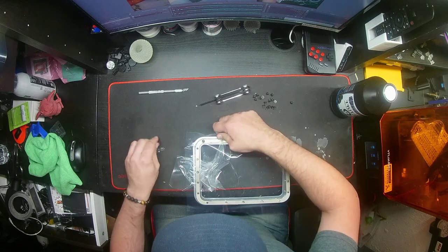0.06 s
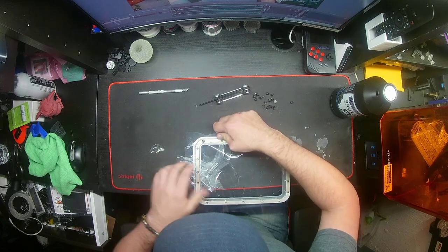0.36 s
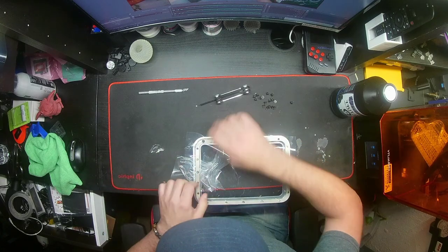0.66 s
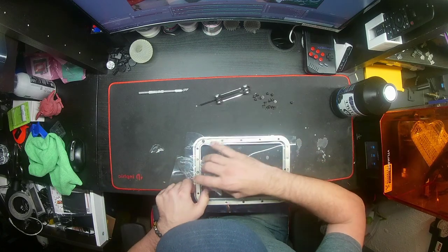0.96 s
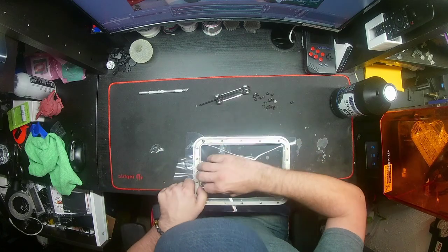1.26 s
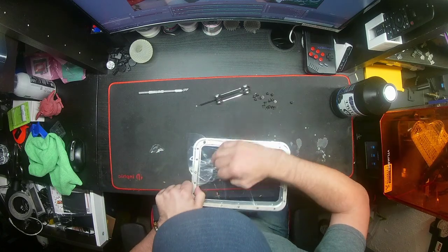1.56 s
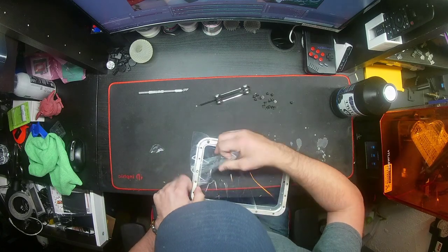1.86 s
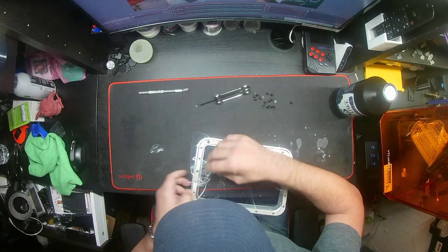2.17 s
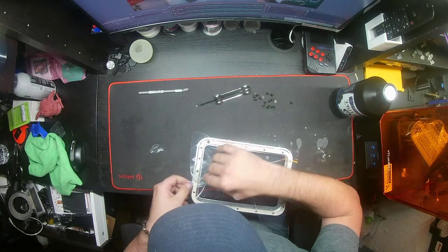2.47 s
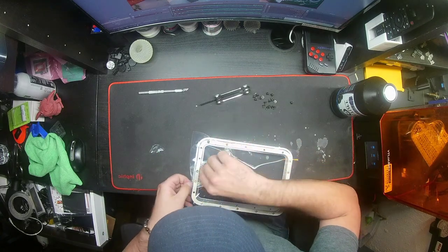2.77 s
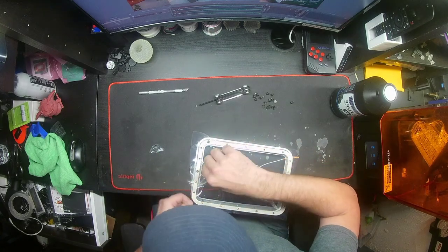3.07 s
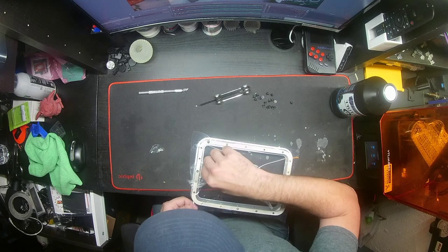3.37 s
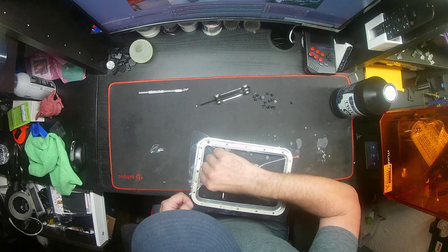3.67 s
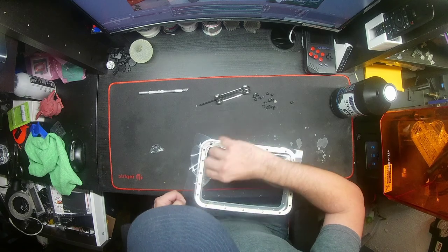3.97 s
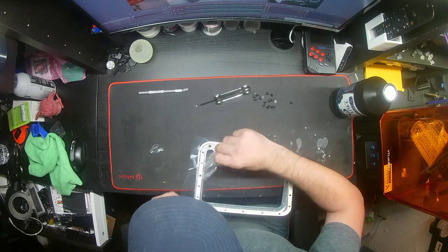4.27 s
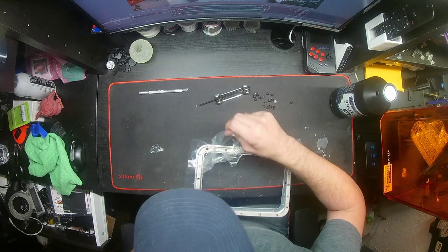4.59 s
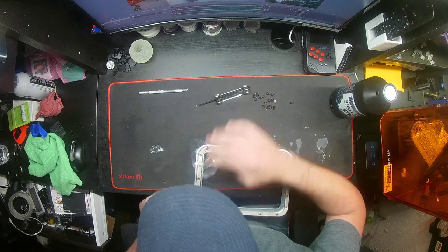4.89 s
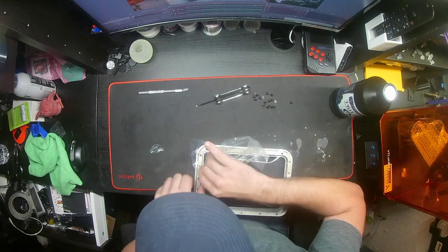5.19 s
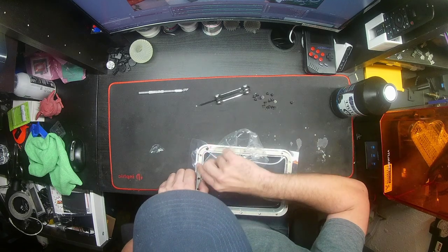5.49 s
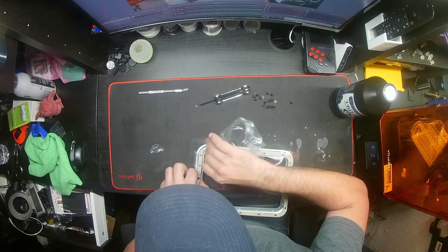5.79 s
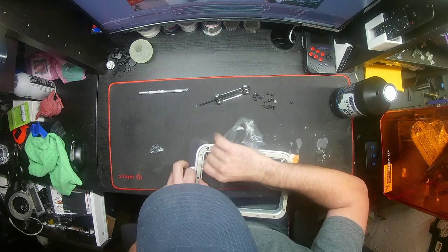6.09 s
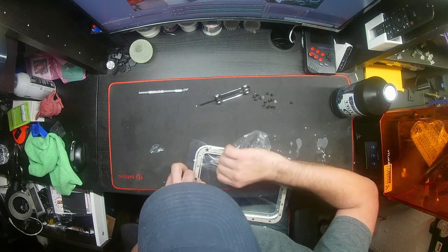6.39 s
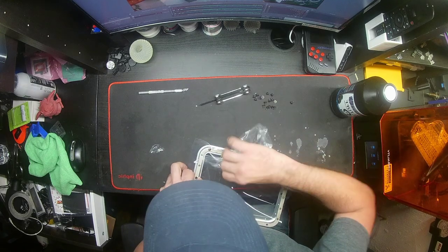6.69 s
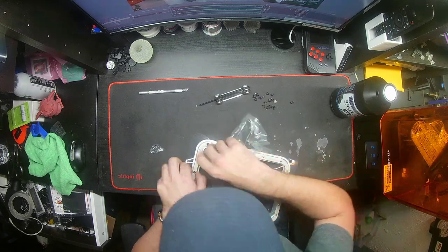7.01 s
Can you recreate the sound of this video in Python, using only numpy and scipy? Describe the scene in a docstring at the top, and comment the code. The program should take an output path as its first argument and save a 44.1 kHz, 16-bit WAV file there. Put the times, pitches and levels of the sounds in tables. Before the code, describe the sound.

A quiet fan hums in a small room while thin plastic film is pulled from a stiff frame, heard from nearby. The film rustles, rubs and snaps in three main bursts, with softer crackles between them and a few tiny squeaks where it grips. Fingers occasionally clack on the frame, and from about halfway it knocks dully against the desk. The sharpest cracks come near the end.

```python
"""Crinkling and sharp crackles over a quiet fan: hands peel and crumple a thin plastic film off a rigid
frame, at a desk in a small room. The film buckles in showers of tiny snaps, and single creases give way
with a louder crack. It rubs along the frame and squeaks where it grips. Now and then the frame clacks
under a tap, and in the second half it bumps the desk with dull thuds."""
import sys
import numpy as np
from scipy import signal
from scipy.fft import rfft, irfft
from scipy.io import wavfile
from scipy.ndimage import uniform_filter1d

SR = 44100
rng = np.random.default_rng(int(sys.argv[2]) if len(sys.argv) > 2 else 0)


def put_to_file(sound):
    """Save the sound as 16-bit audio at rate SR, in the file named by the first command-line argument."""
    columns = np.atleast_2d(sound).T  # one column per channel
    safe = np.clip(columns, -1, 1)
    whole_steps = np.round(safe * 32767)
    wavfile.write(sys.argv[1], SR, whole_steps.astype(np.int16))


N = 310905

# The tone of the moving air. Each row: frequency in Hz, relative level in dB.
AIR_COLOUR = [(12, -58), (25, -62.5), (50, -69), (80, -71.5), (180, -80.5), (400, -87), (900, -88),
              (1400, -95.5), (2800, -100), (6000, -106), (8700, -105), (12000, -114), (16000, -122)]
# The fan's hum. Each row: pitch in Hz, level in dB.
FAN_TONES = [(98, -68), (141.5, -65), (468, -68), (511.5, -70), (942.5, -65.5), (990, -70)]
# Pulls on the film. Each row: start in seconds, seconds spent taking up slack before that, length in
# seconds, crinkling level in dB and sliding level in dB at the pull's end, rise over the pull in dB.
PULLS_ON_FILM = [(0.527, .025, 0.059, -50.5, -51.5, -0.5), (0.739, .01, .04, -55, -58, 0),
                 (0.924, 0.035, 0.022, -44.5, -41, 1.5), (1.01, .05, 0.23, -35, -50.5, 3.5),
                 (1.262, 0.0057, 0.065, -31.5, -40, 0), (1.344, .01, 0.056, -35.5, -42, 0),
                 (1.524, .005, 0.035, -37.5, -42, 0), (1.59, 0.018, 0.086, -46.5, -49.5, -2.5),
                 (1.726, .03, 0.031, -49.5, -50, 0), (1.85, .02, 0.18, -52, -60, -1),
                 (2.1, .005, 0.028, -54.5, -55, 0), (2.604, 0.074, 0.027, -50.5, -57, 1.5),
                 (2.683, .01, .11, -51, -55, 0), (3.214, 0.028, 0.013, -57, -56, -3),
                 (3.388, 0.03, .11, -41.5, -47.5, 3.5), (3.544, 0.012, 0.16, -32.5, -37.5, 7),
                 (3.85, 0.013, 0.13, -37, -46.5, 2), (4.029, .03, 0.19, -36.5, -43, 1.5),
                 (4.24, 0.016, 0.066, -26.5, -33, 0), (4.362, .02, 0.043, -59, -56, -2),
                 (4.502, .01, .19, -58.5, -60, -6), (4.98, 0.035, 0.064, -52, -55.5, 0.5),
                 (5.208, .004, 0.045, -49, -51.5, -4), (5.346, 0.018, 0.023, -48, -43, 8),
                 (5.438, .005, 0.036, -46, -45, 7.5), (5.556, 0.049, 0.029, -46, -46.5, 1.5),
                 (5.638, .015, 0.12, -40.5, -51, -2), (5.893, 0.047, 0.066, -37.5, -45.5, 6),
                 (5.993, 0.043, 0.061, -25, -40, -1.5), (6.086, .02, 0.12, -36.5, -51.5, -2.5),
                 (6.257, 0.0057, 0.052, -25, -32.5, 0.5), (6.416, .002, 0.035, -36, -36, -1),
                 (6.528, .02, 0.19, -54, -55.5, -5), (6.937, 0.076, 0.073, -48.5, -55.5, 1)]
# The tones of crinkling, sliding, a crack and a tap. Each row: frequency in Hz, relative level in dB.
CRINKLING_COLOUR = [(200, -36), (700, -11), (1500, -9.5), (2600, -9), (3800, -3), (5000, -7), (6500, -0.5),
                    (8200, 0), (10200, -5.5), (12500, -2.5), (16000, -13.5)]
SLIDING_COLOUR = [(150, -12.5), (400, -4), (620, -6), (850, -0.5), (1700, -1), (3200, -1.5), (6000, -10.5),
                  (16000, -34)]
CREASE_COLOUR = [(200, -7.5), (900, -12), (2500, 0), (4000, -4.5), (7500, 4.5), (10000, 0.5), (12500, 4),
                 (16000, -10)]
TAP_COLOUR = [(150, -9), (450, -4), (1000, 0.5), (2200, -7), (4200, -13), (9000, -12.5), (16000, -43)]
# The notes the frame rings at. Each row: pitch in Hz, relative level in dB, seconds to fade by 60 dB.
FRAME_MODES = [(521, -5, 0.2), (823, 3.5, 0.033), (1052, 3, 0.052), (1274, -11, 0.074), (1483, -3, 0.014),
               (1750, -5.5, 0.019)]
# Single creases snapping. Each row: start in seconds, level in dB, pitch of the ring in Hz.
CREASE_SNAPS = [(.577, -29, 11400), (.639, -28.5, 8640), (.749, -29, 6600), (.77, -27.5, 8740),
                (1.264, -14, 12400), (1.321, -13, 6600), (1.326, -11.5, 7800), (1.393, -23, 7100),
                (1.479, -17.5, 3000), (1.483, -23.5, 2900), (1.527, -19, 4400), (1.808, -24.5, 12700),
                (1.822, -25.5, 3530), (1.892, -24.5, 7100), (1.921, -28, 11400), (2.013, -27.5, 3300),
                (2.102, -31.5, 6560), (2.226, -32, 3420), (2.27, -33.5, 6900), (2.293, -32.5, 6300),
                (2.609, -31.5, 11600), (2.745, -30, 6050), (2.768, -28, 7800), (2.803, -33.5, 7400),
                (2.884, -29.5, 11500), (3.102, -38, 5300), (3.142, -33, 5200), (3.265, -35.5, 7600),
                (3.364, -27.5, 6500), (3.43, -22.5, 11600), (3.474, -16.5, 6250), (3.55, -17, 7350),
                (3.833, -29, 7100), (3.945, -16, 4100), (4.234, -22, 6500), (4.491, -30, 6150),
                (4.514, -30, 6040), (4.63, -28.5, 9400), (4.842, -31.5, 7500), (4.922, -32.5, 6700),
                (5.109, -28, 6400), (5.139, -31, 7200), (5.207, -27.5, 7600), (5.247, -25, 4440),
                (5.292, -29, 6640), (5.319, -26.5, 6800), (5.436, -24.5, 7000), (5.481, -25.5, 7300),
                (5.626, -30, 7160), (5.758, -19.5, 6800), (5.868, -24, 6760), (5.922, -18.5, 6600),
                (5.968, -20, 6300), (5.985, -15, 9600), (6.033, -10, 7700), (6.188, -17.5, 6900),
                (6.259, -14, 6940), (6.28, -8, 11800), (6.413, -13.5, 6500), (6.423, -12.5, 8300),
                (6.461, -14.5, 8350), (6.559, -24.5, 4060), (6.647, -28.5, 11500), (6.695, -28, 7900),
                (6.804, -28.5, 7000), (7.003, -25.5, 8140)]
# Fingers and film tapping the frame. Each row: start in seconds, level in dB.
FRAME_TAPS = [(0.931, -29), (0.946, -27), (1.264, -26), (1.559, -30), (2.633, -33), (3.215, -34),
              (3.328, -36), (4.982, -35.5), (4.999, -26), (5.214, -25), (5.271, -31), (6.805, -32.5)]
# The film squeaking under the fingers. Each row: start in seconds, length in seconds, pitch in Hz,
# level in dB.
FILM_SQUEAKS = [(1.019, 0.048, 1744, -41.5), (1.087, 0.059, 2990, -40), (1.13, 0.083, 1750, -44.5),
                (1.184, 0.038, 2360, -40), (1.285, .07, 1560, -41), (3.85, 0.036, 3500, -38.5),
                (3.939, 0.04, 4140, -37.5)]
# The frame bumping the desk. Each row: start in seconds, level in dB, contact time in milliseconds.
DESK_BUMPS = [(3.765, -30.5, 4.9), (4.165, -32, 2.1), (4.27, -30.5, 7.5), (4.309, -19.5, 3),
              (4.338, -33, 9.4), (4.387, -18.5, 4.4), (4.425, -26.5, 9.8), (4.481, -37.5, 8.9),
              (5.205, -38, 3.5), (5.645, -29, 0.52), (5.748, -39, 2), (5.805, -36.5, 1.4),
              (5.882, -25.5, 4.9), (5.988, -29, 1.9), (6.229, -32, 0.99), (6.264, -34.5, 1.5),
              (6.448, -30, 1.6), (6.708, -33.5, 4.7), (6.737, -33, 6.6)]
# The notes of the desk with the frame on it. Each row: pitch in Hz, relative level in dB, seconds to
# fade by 60 dB.
DESK_MODES = [(72, -11, 0.51), (94.2, -4.5, 0.23), (127.6, -5.5, 0.11), (177, 4.5, 0.052), (217, 1, 0.18),
              (316, -29, 0.097), (368, -8.5, 0.13), (391.5, 2, 0.13)]

FIRST_TOUCH_S, RESTING_CRINKLE_DB, RESTING_SLIDE_DB = .51, -68, -64.5  # hands just holding the film
TAKE_UP_DB = 22  # the rustle rises this much while the slack is taken up
RELAX_DB_PER_S = 334  # the film falls quiet when a pull ends
SETTLE_DB, SETTLE_DB_PER_S = -13.5, 75  # a weaker rustle lingers as it settles
STRAY_PER_S, STRAY_HZ, STRAY_OCTAVES = 13, 7000, 0.6  # stray creases: rate, typical pitch, its spread
STRAY_OVER_DB, STRAY_FLOOR_DB = 8, -45  # their typical level: above the crinkling, and at its lowest
STRAY_SCATTER_DB = 6.5  # random spread around that level


def undb(db):
    """Turn decibels into a number to multiply by."""
    return 10 ** (np.asarray(db) / 20)


def unit(x):
    """Scale to an energy of one."""
    return x / np.sqrt(np.sum(x ** 2))


def seconds(size):
    """The time in seconds of each of so many samples."""
    return np.arange(size) / SR


def fade(t, t60):
    """Die away by 60 dB every t60 seconds."""
    return np.exp(-np.log(1000) * t / t60)


def add(out, start_s, x):
    """Mix x into out, beginning at start_s."""
    i = max(int(start_s * SR), 0)
    out[i:i + len(x)] += x[:max(len(out) - i, 0)]


def through(x, response):
    """Filter x: every sample sets off its own copy of the response."""
    return signal.oaconvolve(x, response)[:len(x)]


def resonate(x, hz, q):
    """Keep the sound near one pitch; a higher q rings longer."""
    return signal.lfilter(*signal.iirpeak(min(hz, SR / np.e), max(q, 1), fs=SR), x)


def colour(points, size=1024):
    """Make a filter response whose tone follows the (Hz, dB) points."""
    hz, db = np.transpose(points)
    bins_hz = np.maximum(np.fft.rfftfreq(size, 1 / SR), 1)
    gains = undb(np.interp(np.log(bins_hz), np.log(hz), db))
    cepstrum = irfft(np.log(gains))
    # folding this in half packs the energy at the start, so clicks stay sharp
    cepstrum[1:size // 2] *= 2
    cepstrum[size // 2 + 1:] = 0
    return unit(irfft(np.exp(rfft(cepstrum))))


def walk(per_s):
    """Glide between random values, mostly within -1 to 1, per_s times a second."""
    return np.interp(seconds(N) * per_s, np.arange(N), rng.standard_normal(N))


def even(x, span_s):
    """Hold the slow level of x at one and keep its fine grain."""
    size = max(int(span_s * SR), 2)
    power = uniform_filter1d(uniform_filter1d(x ** 2, size), size)
    return x / np.sqrt(np.maximum(power, 1e-12))


def shower(per_s, spread_db):
    """Random clicks: many small ones and a few large."""
    happens = rng.random(N) < per_s / SR
    size = np.minimum(rng.exponential(size=N), 3.5)
    return happens * undb(spread_db * size) * rng.choice([-1, 1], N)


def ring(modes, t, scatter_db, detune):
    """A struck object rings; each grip and point of contact changes its notes a little."""
    chance = rng.standard_normal((len(modes), 2))
    return sum(undb(db + scatter_db * louder)
               * np.sin(2 * np.pi * hz * (1 + detune * higher) * t) * fade(t, t60)
               for (hz, db, t60), (louder, higher) in zip(modes, chance))


def fan():
    """Moving air rumbles and hisses under the wavering tones of a fan."""
    noise = rng.standard_normal(N + 8192)
    air = through(noise, colour(AIR_COLOUR, size=8192))[-N:] * undb(-44)
    t = seconds(N)
    hum = sum(np.sqrt(2) * undb(db + 1.2 * walk(5.6)) * np.sin(2 * np.pi * hz * t + 0.72 * walk(7))
              for hz, db in FAN_TONES)
    return air + hum


def pull_loudness(levels_db, resting_db):
    """The level in dB over time: each pull takes up slack, holds, lets go and leaves the film settling."""
    t = seconds(N)
    power = undb(resting_db) ** 2 * (t > FIRST_TOUCH_S) + 1e-10
    for (start, take_up, length, _, _, rise_db), db in zip(PULLS_ON_FILM, levels_db):
        before, after = np.maximum(start - t, 0), np.maximum(t - start - length, 0)
        attack_db = -TAKE_UP_DB * before / take_up
        hold_db = db - rise_db * np.clip(1 - (t - start) / length, 0, 1)
        release_db = np.maximum(-RELAX_DB_PER_S * after, SETTLE_DB - SETTLE_DB_PER_S * after)
        power += undb(attack_db + hold_db + release_db) ** 2
    return 10 * np.log10(power)


def crinkle(level_db, patches=12):
    """Small patches of film buckle in showers of snaps, thicker the harder the film is worked."""
    per_s = 1900 * undb(.8 * (np.minimum(level_db, -25) + 35))
    out, t = np.zeros(N), seconds(512)
    for hz in np.linspace(2200, 14000, patches):
        # each patch takes the strain for a moment, then hands it on
        snaps = np.abs(shower(per_s / patches, spread_db=5.0)) * undb(2.1 * walk(22))
        flutter, crack = rng.standard_normal((2, N))
        flutter = resonate(flutter * through(snaps, fade(t, 0.013)), hz, q=hz / 1700)
        crack = crack * through(snaps, fade(t, 0.0017))
        out += unit(flutter) + 1.32 * unit(crack)
    rustle = through(out * np.sqrt(N), colour(CRINKLING_COLOUR))
    return even(rustle, span_s=0.022) * undb(level_db - 1.2)


def slide(level_db):
    """Film and fingers stick and slip along the frame."""
    slips = through(shower(per_s=2500, spread_db=4.5), colour(SLIDING_COLOUR))
    # the moving contact brings out one note of the frame after another
    body = sum(undb(db + 5.3 * walk(20)) * resonate(slips, hz, q=18) for hz, db, _ in FRAME_MODES)
    return even(slips + 0.9 * body, span_s=0.05) * undb(level_db - 3.0)


def crackles(creases):
    """A crease gives way: a sharp crack, a brief ring, then smaller snaps as it settles."""
    out, t = np.zeros(N), seconds(1024)
    tone = colour(CREASE_COLOUR)
    for start, db, hz in creases:
        crack, flutter = rng.standard_normal((2, len(t)))
        run_s = 0.0044 * undb(0.12 * (db + 40))  # a louder snap runs along a longer crease
        settling = 0.4 * rng.random(len(t)) * (rng.random(len(t)) < 600 / SR) * fade(t, 0.044)
        clicks = (t == 0) + settling
        crack = through(crack * through(clicks, fade(t, run_s)), tone)
        flutter = resonate(flutter * through(clicks, fade(t, 1.08 * run_s)), hz, q=4.7)
        snap = unit(crack) + 0.85 * unit(flutter)
        add(out, start, undb(db + 0.43) * snap / np.abs(snap).max())
    return out


def stray_creases(level_db):
    """Lesser creases give way at random, louder under more strain. Returns rows like CREASE_SNAPS."""
    chance = rng.standard_normal((200, 2))
    starts = FIRST_TOUCH_S + np.cumsum(rng.gamma(2, .5, len(chance))) / STRAY_PER_S
    rows = []
    for start, (louder, higher) in zip(starts, chance):
        if start * SR < N:
            typical_db = max(level_db[int(start * SR)] + STRAY_OVER_DB, STRAY_FLOOR_DB)
            hz = STRAY_HZ * 2 ** (STRAY_OCTAVES * higher)
            rows.append((start, typical_db + STRAY_SCATTER_DB * louder, hz))
    return rows


def taps():
    """Light blows on the frame give a dry clack; the hand holding it muffles most of the ring."""
    out, t = np.zeros(N), seconds(8192)
    tone = colour(TAP_COLOUR)
    for start, db in FRAME_TAPS:
        clack = through(rng.standard_normal(len(t)) * fade(t, 0.036), tone)
        tap = unit(clack) + .45 * unit(ring(FRAME_MODES, t, scatter_db=2, detune=.01))
        add(out, start, undb(db - 1.5) * tap / np.abs(tap).max())
    return out


def squeaks():
    """Where the film grips, it slips in a fast, ragged rhythm, heard as a pitch with two overtones."""
    out = np.zeros(N)
    for start, length, hz, db in FILM_SQUEAKS:
        size = int(length * SR)
        pitch_hz = hz * (1 + 0.017 * walk(55.6) + 0.095 * walk(2517))[:size]
        phase = 2 * np.pi * np.cumsum(pitch_hz) / SR
        tone = np.sin(phase) + 1.1 * np.sin(2 * phase) + 0.34 * np.sin(3 * phase)
        loudness = undb(db - 3 + 2.4 * walk(550)[:size]) * signal.windows.tukey(size)
        add(out, start, loudness * tone)
    return out


def bumps():
    """The frame pushes on the padded desk; a longer contact gives a duller thud."""
    out, t = np.zeros(N), seconds(16384)
    for start, db, contact_ms in DESK_BUMPS:
        push = np.sin(np.pi * np.minimum(1000 * t / contact_ms, 1))
        scuff = resonate(rng.standard_normal(len(t)) * fade(t, 0.14), hz=198, q=1.3)
        body = unit(ring(DESK_MODES, t, scatter_db=2.0, detune=0.011)) + .5 * unit(scuff)
        thud = through(body, push) * (1 - fade(t, 0.039))  # with a softened start
        add(out, start, undb(db + 0.24) * thud / np.abs(thud).max())
    return out


def room(x, paths=6):
    """Quick echoes off the desk and its clutter, then a duller tail; the paths shift from fold to fold."""
    t = seconds(22050)
    walls = colour([(100, -2.0), (900, 2.5), (4000, 1), (9000, -3.5), (16000, -3.5)])
    shares = np.array([walk(55) for _ in range(paths)])
    shares /= np.sqrt(np.sum(shares ** 2, axis=0))  # their total power stays the same
    out = x
    for share in shares:
        near, far = rng.standard_normal((2, len(t)))
        early = near * (rng.random(len(t)) < .15) * (t > .0012) * fade(t, 0.054)
        late = through(far, walls) * (1 - fade(t, 0.023)) * fade(t, 0.34)
        out = out + through(x * share, undb(-3.0) * unit(early) + undb(-8.5) * unit(late))
    return out


def scene():
    """Film and frame echo in the room; the desk thuds below them, over the fan."""
    _, _, _, crinkle_levels, slide_levels, _ = np.transpose(PULLS_ON_FILM)
    crinkle_db = pull_loudness(crinkle_levels, RESTING_CRINKLE_DB)
    slide_db = pull_loudness(slide_levels, RESTING_SLIDE_DB)
    handling = crinkle(crinkle_db) + slide(slide_db) + squeaks() + taps()
    handling += crackles(list(CREASE_SNAPS) + stray_creases(crinkle_db))
    return (room(handling) + bumps() + fan())[None]


def record(dry):
    """Round off the loudest peaks and cut the treble above 16000 Hz."""
    ceiling = undb(-7.0)
    rounded = ceiling * np.tanh(dry / ceiling)
    return signal.sosfilt(signal.ellip(10, .2, 70, 16000, fs=SR, output="sos"), rounded)


dry = scene()
out = record(dry)
put_to_file(out)
```